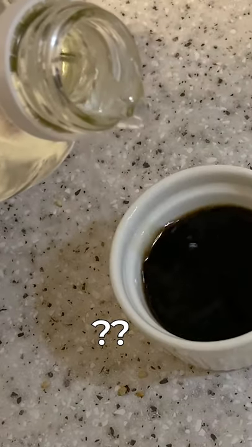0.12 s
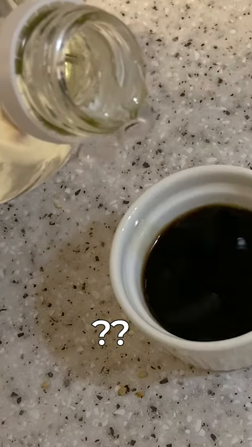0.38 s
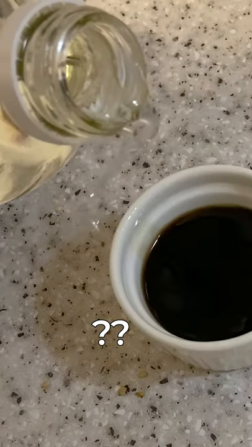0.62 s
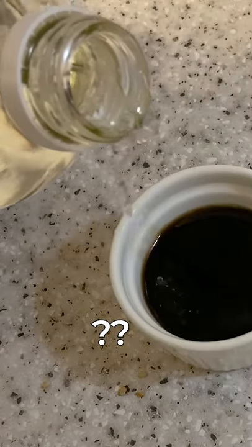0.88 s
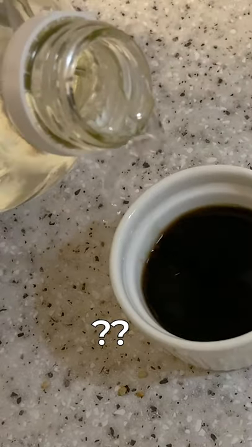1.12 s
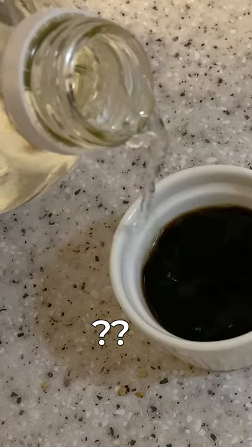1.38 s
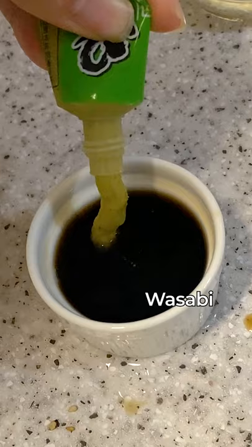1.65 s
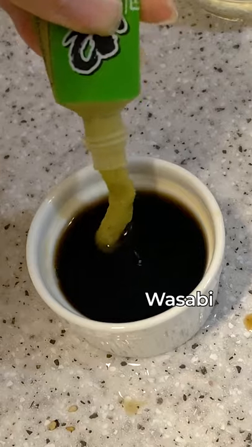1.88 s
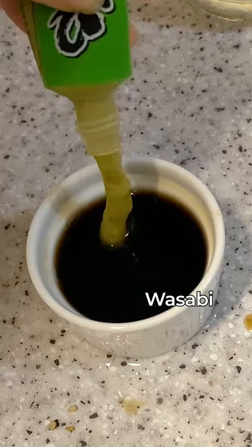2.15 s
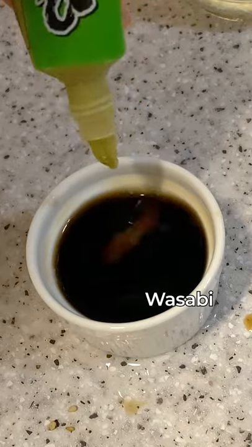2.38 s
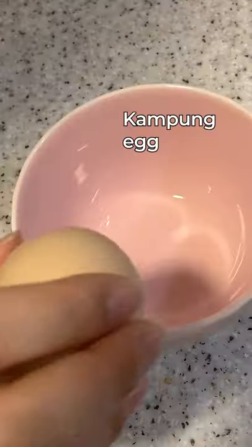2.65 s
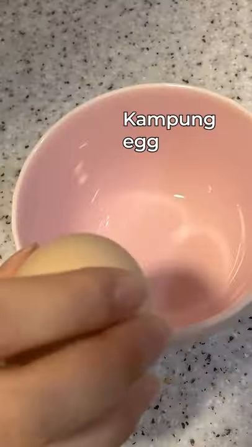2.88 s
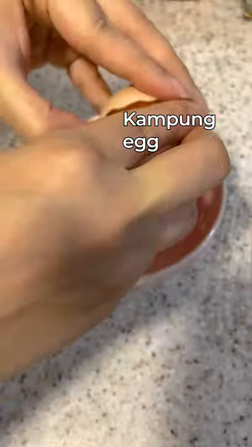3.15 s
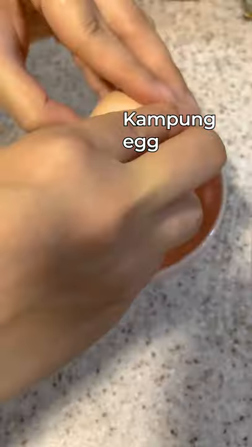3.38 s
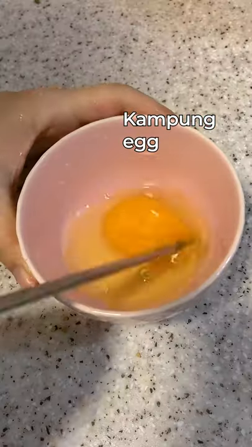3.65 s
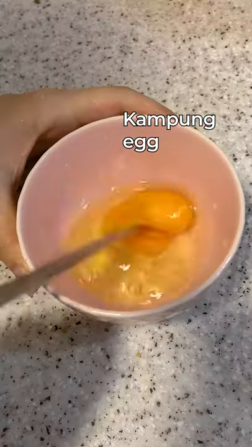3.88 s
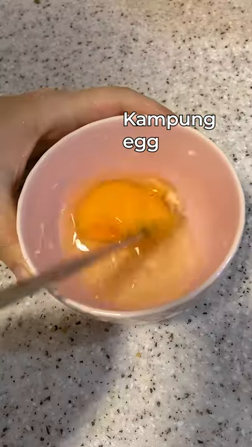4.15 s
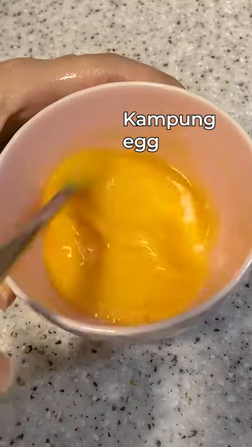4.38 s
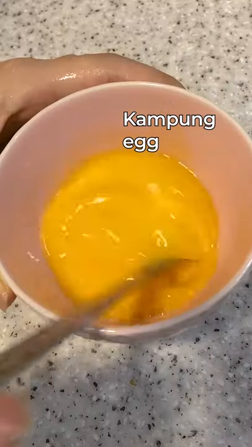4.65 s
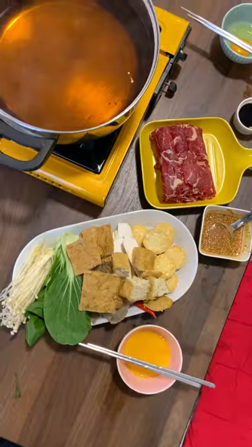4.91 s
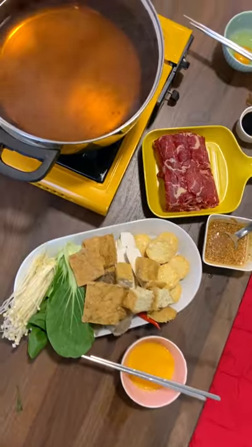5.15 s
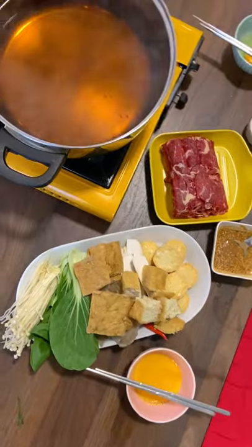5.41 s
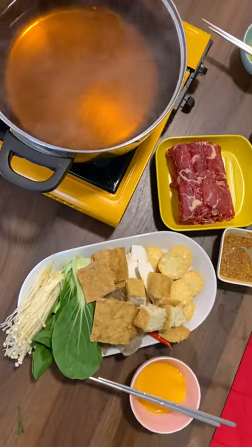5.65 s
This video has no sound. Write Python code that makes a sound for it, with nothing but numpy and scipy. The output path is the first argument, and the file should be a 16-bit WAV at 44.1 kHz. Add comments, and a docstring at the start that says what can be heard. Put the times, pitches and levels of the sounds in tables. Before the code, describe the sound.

Close on a kitchen counter, stereo phone-like microphone, hard cuts. A bottle tipping over a dish plays slowed: sparse ticks, liquid blips, deep dull bumps. A tube of paste gives one short wet crackle over room air and hum. An egg knocks very loudly on a bowl, the shell cracks crisply, then chopsticks beat it in quick, soft, jumpy strokes. It ends on a steady simmering wash.

```python
"""An egg is knocked on a bowl and cracked open, then beaten with chopsticks, jumping and stuttering: struck tones and noise.
Before it come a glass bottle tipped over a dish (played slow: low and dull) and a squeezed tube of paste, made of short
noise snaps and tones; after it a pot simmers on a laid table, as steady noise. The five moments are joined by hard cuts.
Room air (noise) and an appliance hum (steady tones) lie under the bottle, tube and egg; faint hiss lies under the beating."""
import sys
import numpy as np
from scipy import signal
from scipy.fft import rfft, irfft
from scipy.io import wavfile
from scipy.ndimage import uniform_filter1d

SR = 44100
rng = np.random.default_rng(int(sys.argv[2]) if len(sys.argv) > 2 else 0)


def generate_wav(sig):
    """Save sig (samples, or channels by samples) to the path in sys.argv[1] as 16-bit PCM at SR."""
    pcm = np.round(np.clip(np.atleast_2d(sig).T, -1, 1) * 32767).astype(np.int16)
    wavfile.write(sys.argv[1], SR, pcm)


def field_ratio(decibels):
    """Amplitude ratio for a level in dB (20 dB per decade); scalars and array-likes work."""
    return 10 ** (np.asarray(decibels, dtype=float) / 20)


N = 254885   # length in samples
TIME = np.arange(N) / SR
HZ = np.maximum(np.fft.rfftfreq(N, 1 / SR), 1)
SLOW = 0.3   # playing speed of the bottle moment

# Noise bands of a bright snap: (low edge [Hz], high edge [Hz])
MIDDLE_BAND = (2500, 6500)
TOP_BAND = (6500, 16000)
# Egg and bowl hit the counter: (time [s], low peak [dB], middle [dB re low], top [dB re low],
# counter body [dB re low], counter depth [dB re low])
KNOCKS = [(2.9012, 4.5, -8, -8.5, -14, -15.5), (2.959, -10, -17, -36.5, 5, -13),
          (2.991, -13.5, -23.5, -44, -2, -30), (3.003, -17.5, -31, -40.5, 9, -15.5),
          (3.032, -29, -29, -42, 8, -19.5)]
# Tones of the counter, deepest first: (pitch [Hz], level [dB], time to fall 60 dB [s])
COUNTER_TONES = [(97, 0, 0.16), (291.4, -6, 0.047), (328.7, -5.5, 0.065), (463, -9, 0.059)]
# Dull tones of the bowl standing on it: (pitch [Hz], level [dB], time to fall 60 dB [s])
BOWL_ON_COUNTER = [(565, -6.5, 0.095), (680.7, -0.5, 0.059), (848, 1, 0.04), (934, 5, 0.027),
                   (1168, -15, 0.045), (1267, -4.5, 0.03), (1485, -13.5, 0.032), (1788, -8, 0.027),
                   (2230, -18, 0.049)]
# Fingers slide the egg to the rim: (time [s], peak [dB], time to fall 60 dB [s])
SLIDE = (2.718, -39, 1.0)


def knocks():
    """A crack, the dull ring of the bowl, then the slower counter; the bowl rocks and lands again."""
    out = np.zeros(N)
    for s, low_db, middle_db, top_db, body_db, depth_db in KNOCKS:
        bowl = ring(BOWL_ON_COUNTER, rise_s=0.0037)[:SR // 2]
        thud = puff(440, 2000, 0.15, tail_db=-16.5)
        add(out, s, bowl + 3.3 * thud, low_db)
        add(out, s, puff(*MIDDLE_BAND, 0.16, tail_db=-16.5), low_db + middle_db)
        add(out, s, puff(*TOP_BAND, 0.096, tail_db=-15), low_db + top_db)
        add(out, s, ring(COUNTER_TONES[1:], rise_s=0.0049), low_db + body_db)
        # the counter's deepest tone builds up late, by 0.021 s
        add(out, s + 0.021, ring(COUNTER_TONES[:1], rise_s=0.0068), low_db + depth_db)
    slide_s, slide_db, slide_t60 = SLIDE
    add(out, slide_s, puff(200, 1800, slide_t60, rise_s=0.0032, tail_db=-2.0), slide_db)
    return turned(placed(out, room_db=-10.5), PORTS_NEAR, 0.98)


# Tones of a small hollow: (share of its ring pitch [ratio], level [dB], ring cycles to fall 60 dB [count])
HOLLOW_TONES = [(.88, -8, 18), (1, 0, 36), (1.13, -6, 22)]
# Where the hands are: (time [s], left over right [dB])
LEAN = [(3.2, -0.8), (3.35, -1.8), (3.5, -3), (4.2, -2.5)]


def cracks(rows):
    """Each crack or click rings a small hollow for a few cycles under a bright snap."""
    out = np.zeros(N)
    for s, ring_db, ring_hz, snap_db, snap_hz, top_db in rows:
        tones = [(share * ring_hz, db, cycles / ring_hz) for share, db, cycles in HOLLOW_TONES]
        add(out, s, ring(tones, rise_s=0.001), ring_db)
        add(out, s, puff(340, 1300, 0.033, rise_s=0.0023), ring_db + snap_db - 18)
        snap = puff(snap_hz / 1.3, snap_hz * 1.3, 0.1, tail_db=-11.5)
        snap = snap + 0.38 * puff(*MIDDLE_BAND, 0.071, tail_db=-12)
        add(out, s, snap, ring_db + snap_db)
        add(out, s, puff(*TOP_BAND, 0.014, tail_db=-10.5), ring_db + top_db)
    lean_db = np.interp(TIME, *np.transpose(LEAN))
    return placed(out, room_db=-19) * field_ratio(lean_db / 2 * [[1], [-1]])


# The shell cracks: (time [s], hollow ring peak [dB], ring pitch [Hz], snap [dB re ring], snap pitch [Hz],
# top [dB re ring]), before the lean to one side
SHELL_CRACKS = [(3.1955, -34.5, 1800, 5.5, 3800, 1), (3.1983, -15.5, 1660, 7.5, 3800, 14.5),
                (3.2332, -12.5, 1960, 5, 5700, 14.5), (3.2404, -23.5, 2200, 9, 3320, -17.5),
                (3.2912, -12, 1920, -8.5, 4700, -21), (3.3065, -21, 1790, -0.5, 5050, -22.5),
                (3.3098, -20, 1730, -4, 5070, -18), (3.323, -24.5, 1810, 0, 4200, 3),
                (3.4312, -37, 1890, -3, 3000, -13), (3.4395, -41, 1700, -0.5, 4000, 10),
                (3.5087, -25.5, 2960, -2, 4300, -1), (3.5474, -28.5, 2800, 1.5, 2110, -7.5),
                (3.6282, -52.5, 2020, 11.5, 4000, 8)]
# Colour of the room air around the egg: (frequency [Hz], relative level [dB])
AIR_EGG = [(15, -45.5), (25, -13.5), (66, 4.5), (270, -6.5), (317, -9.5), (591, -12.5), (840, -19.5),
           (3620, -33.5), (5280, -44), (9000, -42.5), (16000, -53.5)]


def egg():
    """The egg is knocked and cracked open over noise of room air."""
    return knocks() + cracks(SHELL_CRACKS) + field_ratio(-42) * coloured(AIR_EGG)


# Tones of the bowl in three groups, low, middle and high: (pitch [Hz], level [dB])
BOWL_TONES = [
    [(2051, 0.5), (2326, -11.5)],
    [(2930, -14.5), (5087, 0.5), (5135, -18.5), (6650, -6.5)],
    [(9040, -9), (9345, -7), (11140, -8), (12280, -8), (13800, -0.5), (15600, -12.5)],
]
# How fast each group fades: low, middle, high [dB per s]
BOWL_FADE = [196, 270, 410]


def bowl_ring(group_levels_db, age, phase):
    """The bowl rings in three groups of tones; each group's level wavers at random, most in the high group."""
    waver = rms_one(uniform_filter1d(rng.standard_normal((len(BOWL_TONES), N)), 300))
    swells = field_ratio([[2.5], [4.5], [6.0]] * waver)
    out = np.zeros(N)
    for group_db, fade, swell, group in zip(group_levels_db, BOWL_FADE, swells, BOWL_TONES):
        for hz, db in group:
            out += field_ratio(group_db + db - fade * age) * swell * np.sin(2 * np.pi * hz * TIME + phase)
    return out


def froth():
    """Froth bubbles pop at random, 84 a second, each on one of eight pitches for a few cycles."""
    bursts = (rng.random(N) < 84 / SR) * field_ratio(5.3 * rng.standard_normal(N))
    dealt = rng.integers(0, 8, N)
    out = np.zeros(N)
    for k, hz in enumerate(np.geomspace(600, 3600, num=8)):
        bubble = ring([(hz, 0, 23.0 / hz)], rise_s=0.0028)[:SR // 10]
        out += signal.fftconvolve(bursts * (dealt == k), bubble)[:N]
    return out


# Strokes, each from its start: (time [s], stroke level [dB], low, middle and high bowl ring [dB re stroke],
# slosh [dB re stroke])
STROKES = [(3.719, -48, -16.5, -14, -13, -11), (3.7526, -43, -22.5, -21, -2.5, -6.5),
           (3.8847, -37, -16.5, -10.5, -29.5, -7), (4.0492, -34.5, -11, -11, -26, -5.5),
           (4.2188, -35.5, -24.5, -14.5, -6, -3.5), (4.285, -46, -14.5, -9.5, -15, -18),
           (4.385, -41.5, -20, -19.5, -13, -11.5), (4.4309, -46, -17, -9.5, -26.5, -16),
           (4.5486, -39, -19.5, -11.5, -14, -10.5), (4.7197, -37.5, -31, -16, -17.5, -8.5),
           (4.8843, -35.5, -38, -17, -14, -11.5)]
# Colour of the swish: (frequency [Hz], relative level per Hz [dB])
SWISH = [(400, -24), (700, -43), (1300, -11), (3000, -8.5), (4200, -15), (5100, -7), (6500, -19.5),
         (9300, -13.5), (12000, -19), (15600, -15)]
# Colour of the slosh: (frequency [Hz], relative level per Hz [dB])
SLOSH = [(18, -54), (30, -20), (91, -6.5), (199, -15), (243, -3), (394, -20), (532, -15), (900, -24),
         (1170, -62), (1980, -120)]
# Light hollow clicks of the chopsticks: (time [s], ring peak [dB], ring pitch [Hz], snap [dB re ring],
# snap pitch [Hz], top [dB re ring]), before the lean to one side
CHOPSTICK_CLICKS = [(3.79, -55, 1910, -6, 3000, -10), (3.955, -50, 2930, -7.5, 1492, -20.5),
                    (4.101, -47, 2370, -6, 3015, -17), (4.2501, -30, 1850, -21, 3500, -17),
                    (4.4303, -49.5, 2810, -2.5, 5500, 11.5), (4.678, -60.5, 3000, 10, 4500, 4)]


def beating():
    """Each listed stroke starts abruptly: swish, slosh and bowl ring together, then fading."""
    rows = np.array(STROKES)
    piece = np.clip(np.searchsorted(rows[:, 0], TIME) - 1, 0, None)
    start, stroke_db, *ring_db, slosh_db = rows[piece].T
    age = np.maximum(TIME - start, 0)
    level = np.where(TIME < start, field_ratio(-88.5), field_ratio(stroke_db))   # nearly silent before the first stroke
    phase = rng.uniform(0, 2 * np.pi, len(rows))[piece]
    rings = placed(level * bowl_ring(ring_db, age, phase), room_db=-13)
    # a sharp drop and a slower fade together, in dB per second of age
    swish = (field_ratio(-15.5 - 3500 * age) + field_ratio(-14.5 - 164 * age)) * coloured(SWISH)
    swish = swish + field_ratio(-12 - 103 * age) * froth()
    slosh = coloured(SLOSH)
    slosh_fade = field_ratio(slosh_db - 2 - 1100 * age) + field_ratio(slosh_db - 4 - 290 * age)
    strokes = rings + level * (swish + slosh_fade * slosh)
    return strokes + field_ratio(-63) * slosh + simmer(-63.5) + cracks(CHOPSTICK_CLICKS)


# First step of a stroke, heard again later: (stroke number from 0 [count], delays [steps])
STUTTER = [(0, (2, 4, 9, 14)), (5, (2, 6, 7, 12, 17))]


def stuttered(x):
    """The fast play stutters: the first step of some strokes, 1/30 s long, returns later."""
    out, step = x.copy(), round(SR / 30)
    for stroke, later in STUTTER:
        at = round(STROKES[stroke][0] * SR)
        for steps in later:
            out[:, at + steps * step:at + (steps + 1) * step] = x[:, at:at + step]
    return out


# Ticks of glass and liquid, times as heard: (time [s], top peak [dB], middle [dB re top], low [dB re top])
TICKS = [(0.1435, -43.5, -30, -33), (0.164, -27.5, -27, -44), (0.193, -55, -2.5, -20),
         (0.2968, -36, -24, -40), (0.6918, -23, -4.5, -50), (0.7804, -58, 19.5, 3), (0.8656, -23.5, 1, 6),
         (0.9618, -25, -18, -14.5), (1.187, -23, 5, -15.5), (1.248, -37, -2, -9), (1.2731, -44, 4, -9),
         (1.3827, -36.5, -20, -16.5), (1.5688, -45, -7, -13), (1.5997, -45.5, 6.5, -2),
         (1.6164, -51, 10, 0), (1.6923, -45.5, -17, -12), (1.7081, -40.5, 6, -2)]
# Time for a tick to fall 60 dB, as heard: top, middle, low [s]
TICK_T60_S = (0.057, 0.08, 0.13)
# Broad ring of the wet glass, as heard: (low edge [Hz], high edge [Hz], time to fall 60 dB [s])
GLASS_RING = (1203, 1485, 0.54)
# Liquid blips in the neck, as heard: (time [s], peak [dB], pitch [Hz], time to fall 60 dB [s])
BLIPS = [(.868, -32, 955, 0.016), (0.996, -41.5, 2417, 0.035), (1.53, -42.5, 710, .06),
         (1.617, -43.5, 1050, .07), (1.618, -38, 1595, 0.031), (1.632, -51, 880, 0.044)]


def glass_and_liquid():
    """Slow ticks that ring the wet glass in a broad band, and short tones of liquid in the neck."""
    out = np.zeros(N)
    top_t60, middle_t60, low_t60 = TICK_T60_S
    for s, top_db, middle_db, low_db in TICKS:
        add(out, s, puff(4090, 5245, top_t60), top_db)
        add(out, s, puff(2220, 3680, middle_t60), top_db + middle_db)
        glass = puff(*GLASS_RING, rise_s=0.003, tail_db=-12.0)
        add(out, s, puff(830, 2100, low_t60) + 2.23 * glass, top_db + low_db)
    for s, db, hz, t60 in BLIPS:
        add(out, s, ring([(hz, 0, t60)], rise_s=0.0019), db)
    return out


# Bumps on the counter, times as heard: (time [s], peak [dB], tap [dB re peak], sway [dB re peak])
BUMPS = [(0.989, -14.5, -26, -9), (1.031, -18, -39, -8), (1.214, -25.5, -26, -11), (1.285, -20, -26, -7.5),
         (1.538, -8, -21, -15), (1.566, -16, -36.5, -16), (1.642, -29.5, -31, -1)]
# Tones of a bump at normal speed: (pitch [Hz], level [dB], time to fall 60 dB [s])
BUMP_TONES = [(324, -26, 0.019), (405, 0, 0.017), (506, -4, 0.005)]
# The counter's slowest sway at normal speed, two close tones: (pitch [Hz], level [dB], time to fall 60 dB [s])
SWAY_TONES = [(106.2, 1, 0.44), (104, -10.5, 0.48)]


def counter_bumps():
    """A fingertip tap, the counter's answer with a dull rumble, and (kept apart) its slow sway."""
    bumps, sway = np.zeros(N), np.zeros(N)
    for s, db, tap_db, sway_db in BUMPS:
        add(bumps, s, ring(BUMP_TONES, rise_s=0.0009, speed=SLOW), db)
        # the fingertip is heard 0.0083 s before the counter answers
        add(bumps, s - 0.0083, puff(250, 870, 0.034, rise_s=0.002), db + tap_db)
        add(bumps, s, puff(48, 95, 0.5, rise_s=0.0078, tail_db=-4.5), db - 10)
        add(sway, s, ring(SWAY_TONES, rise_s=0.012, speed=SLOW), db + sway_db)
    return bumps, sway


def tremble():
    """The hand keeps the counter trembling: noise gathered around 31.3 Hz, 23 Hz wide; rms 1."""
    peak = 1 / (1 + (2 * (HZ - 31.3) / 23) ** 2)
    return rms_one(irfft(rfft(rng.standard_normal(N)) * peak, N))


# Colour of the room air played slow, as heard: (frequency [Hz], relative level [dB])
AIR_SLOW = [(24, -33.5), (40, -10.5), (113, -8.5), (235, -14.5), (328, -21), (387, -22), (540, -20.5),
            (1140, -36), (1800, -43), (3000, -46.5), (4800, -49), (5800, -70)]


def bottle():
    """The tipped bottle played slow: ticks, blips, bumps and sway over room air and a lowered hum."""
    bumps, sway = counter_bumps()
    blows = placed(glass_and_liquid(), room_db=-13.5, speed=SLOW) + placed(bumps, room_db=-10.5, speed=SLOW)
    sources = turned(blows, PORTS_NEAR, SLOW) + sway + field_ratio(-35) * tremble()
    return sources + field_ratio(-49) * coloured(AIR_SLOW, SLOW) + field_ratio(4) * hum(SLOW)


# Wet crackle at the nozzle: (time [s], top peak [dB], middle [dB re top], low [dB re top],
# time to fall 60 dB [s])
SQUELCH = [(1.916, -27.5, -10, -10, 0.064), (1.932, -22.5, -9, -15, 0.065)]
# Colour of the room air around the tube: (frequency [Hz], relative level [dB])
AIR_TUBE = [(15, -27), (25, -4.5), (108, -2), (293, -6.5), (363, -11.5), (451, -13.5), (1100, -22),
            (4030, -36.5), (6050, -46.5), (9000, -46), (16000, -62.5)]


def tube():
    """Paste leaves the nozzle with a short bright crackle, over noise of room air."""
    out = np.zeros(N)
    for s, top_db, middle_db, low_db, t60 in SQUELCH:
        add(out, s, puff(*TOP_BAND, t60), top_db)
        add(out, s, puff(*MIDDLE_BAND, t60), top_db + middle_db)
        add(out, s, puff(830, 3600, t60), top_db + low_db)
    return placed(out, room_db=-12) + field_ratio(-45.5) * coloured(AIR_TUBE)


# Colour of the simmering pot: (frequency [Hz], relative level [dB])
SIMMER = [(15, -30), (25, -23), (59, -3.5), (200, -2), (575, -13), (1400, -15.5), (2480, -24.5),
          (5570, -31.5), (9320, -36.5), (12000, -39.5), (16000, -39)]


def simmer(level_db):
    """The simmering pot as a steady wash of coloured noise."""
    return field_ratio(level_db) * coloured(SIMMER)


# Appliance tones at normal speed: (pitch [Hz], level before any boost [dB rms])
HUM = [(328, -59.5), (366, -54.5), (1077, -63.5)]


def hum(speed):
    """Steady appliance tones that waver a little; slow play lowers their pitch."""
    waver = field_ratio(2.0 * rms_one(uniform_filter1d(rng.standard_normal((len(HUM), N)), 4000)))
    out = np.zeros(N)
    for (hz, db), swell in zip(HUM, waver):
        out += np.sqrt(2) * field_ratio(db) * swell * np.sin(2 * np.pi * hz * speed * TIME)
    return out


def puff(low_hz, high_hz, t60, rise_s=0.00019, tail_db=-8):
    """Noise in one band: a sharp snap, then a dying tail."""
    t, t60 = TIME[:SR // 2], np.clip(t60, 0.004, 1)
    snap, tail = field_ratio(-60 * t / (0.088 * t60)), field_ratio(tail_db - 60 * t / t60)
    shape = (1 - np.exp(-t / rise_s)) * (snap + tail)
    band = signal.butter(3, [low_hz, high_hz], "band", fs=SR, output="sos")
    return signal.sosfilt(band, rng.standard_normal(len(t)) * shape)


def ring(tones, rise_s, speed=1):
    """Struck tones that die away, each blow with strengths of its own."""
    t = TIME[:SR] * speed
    out = np.zeros(len(t))
    for hz, db, t60 in tones:
        out += field_ratio(db + 2.5 * rng.standard_normal() - 60 * t / t60) * np.sin(2 * np.pi * hz * t)
    return (1 - np.exp(-t / rise_s)) * out


def add(out, s, shape, db):
    """Lay a short sound with the given peak at time s."""
    at = round(s * SR)
    out[at:at + len(shape)] += field_ratio(db) * shape[:N - at] / np.max(np.abs(shape))


def rms_one(x):
    """Scale to unit power."""
    return x / np.sqrt(np.mean(x ** 2) + 1e-20)


def at_hz(points, speed=1):
    """Read a table over frequency at every frequency of the transform."""
    hz, value = np.transpose(points)
    return np.interp(np.log(HZ / speed), np.log(hz), value)


def coloured(spectrum, speed=1):
    """Stereo noise of a given colour; rms 1."""
    return rms_one(irfft(field_ratio(at_hz(spectrum)) * diffuse(rng.standard_normal((2, N)), speed), N))


def placed(dry, room_db, speed=1):
    """Direct sound plus the room: dying diffuse noise, little bass, treble dying first."""
    t = TIME[:round(1.5 * SR)] * speed
    white = rng.standard_normal((2, len(t))) * (t > 0.002)
    white = signal.sosfilt(signal.butter(1, 300 * speed, "high", fs=SR, output="sos"), white)
    dull = signal.sosfilt(signal.butter(2, 4500 * speed, fs=SR, output="sos"), white)
    # 60 dB down after 0.6 s, the treble after 0.29 s (at normal speed)
    echo = dull * field_ratio(-60 * t / 0.6) + (white - dull) * field_ratio(-60 * t / 0.29)
    echo = echo / np.sqrt(2 * np.sum(echo ** 2, axis=1, keepdims=True))
    return dry + field_ratio(room_db) * irfft(rfft(dry) * diffuse(echo, speed), N)


# How alike left and right are: (frequency at normal speed [Hz], likeness [0 to 1])
LIKENESS = [(250, 0.99), (450, 0.37), (750, 0.18), (1700, 0.49), (2800, 0.55), (4500, 0.093), (6000, 0.98),
            (16000, 1)]


def diffuse(white, speed):
    """Mix two unrelated noises into left and right, as alike as the microphone ports hear them."""
    alike = np.clip(at_hz(LIKENESS, speed), 0, 1)
    mid, side = rfft(white, N)
    return np.sqrt(1 + alike) * mid + np.sqrt(1 - alike) * side * [[1], [-1]]


# The pair of microphone ports: (frequency at normal speed [Hz], left leads by [radians])
PORTS = [(0, 0), (1800, 0), (3000, .5), (5000, .4), (6000, 1.6), (7000, 2.8), (16000, 11.75)]
# Added for blows through the counter: (frequency at normal speed [Hz], left leads by [radians])
PORTS_NEAR = [(0, 0), (400, -.2), (520, -1.4), (680, -3.1), (800, -5.2), (880, -2 * np.pi)]


def turned(x, table, speed):
    """Turn the phase of left forward and of right back."""
    lead = np.interp(HZ / speed, *np.transpose(table))
    return irfft(rfft(x) * np.exp(0.5j * lead * [[1], [-1]]), N)


def microphone(x, speed, top_hz):
    """Two ports hear each pitch with a phase lead of their own, up to a steep treble limit."""
    return irfft(rfft(turned(x, PORTS, speed)) / np.sqrt(1 + (HZ / top_hz) ** 60), N)


# Starts of the moments bottle, tube, egg, beating, table: time [s]
CUTS = [0, 1.7183, 2.7175, 3.6853, 4.9185]


def scene():
    """Each moment is heard through the microphone, then cut in hard."""
    tones = hum(1.0)
    moments = [microphone(bottle(), SLOW, 5800)]
    for x in (tube() + tones, egg() + tones, stuttered(beating()), simmer(-42.5)):
        moments.append(microphone(x, 0.99, 15900))
    return np.choose(np.searchsorted(CUTS, TIME, side="right") - 1, moments)


def roll_off(x):
    """The treble ends steeply here."""
    return signal.sosfilt(signal.butter(12, 16450, fs=SR, output="sos"), x)


def record(dry):
    """The loudest blow overloads: peaks are cut off flat at full scale."""
    overloaded = np.clip(dry, -1, 1)
    return roll_off(overloaded)


dry = scene()
out = record(dry)
generate_wav(out)
```